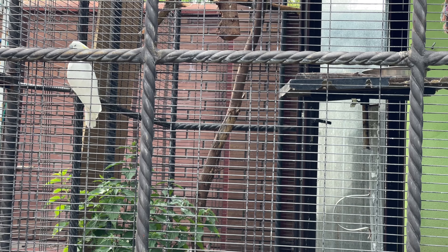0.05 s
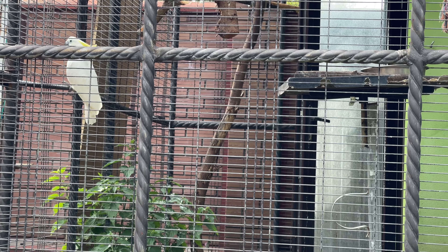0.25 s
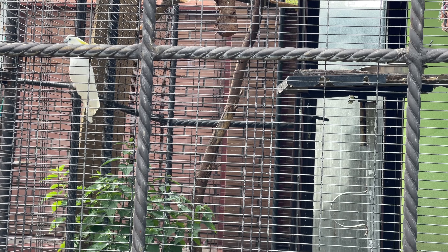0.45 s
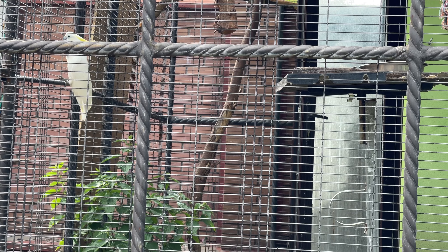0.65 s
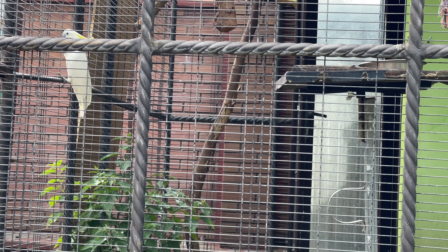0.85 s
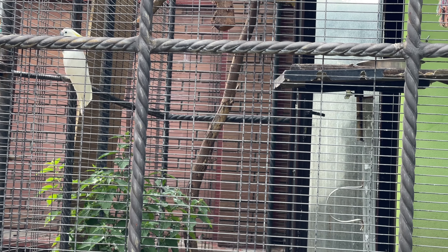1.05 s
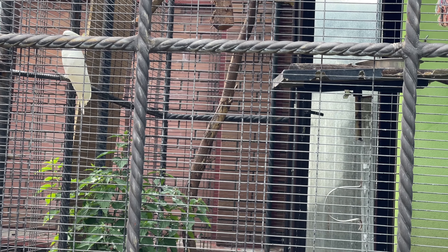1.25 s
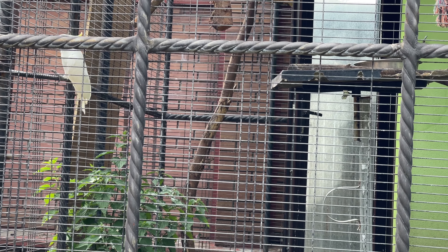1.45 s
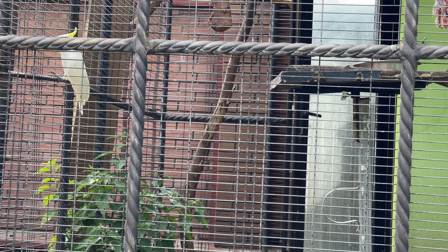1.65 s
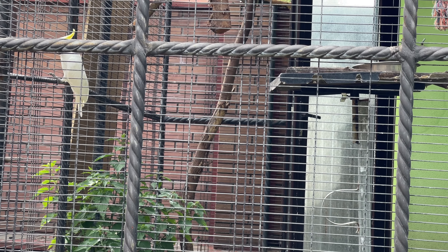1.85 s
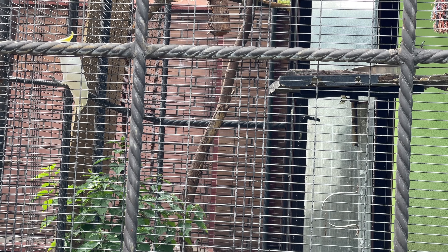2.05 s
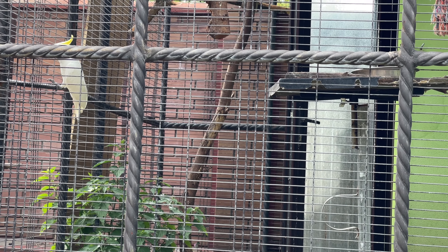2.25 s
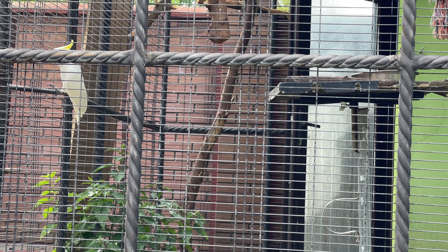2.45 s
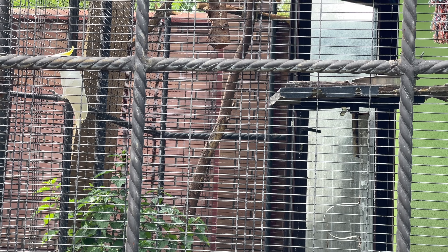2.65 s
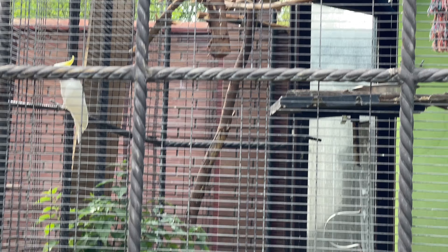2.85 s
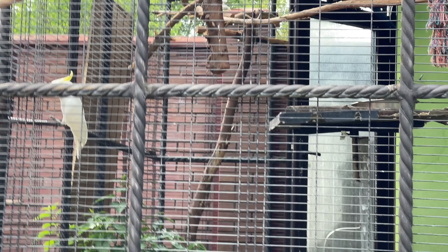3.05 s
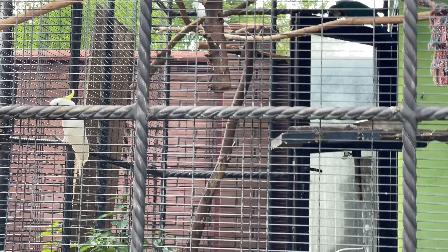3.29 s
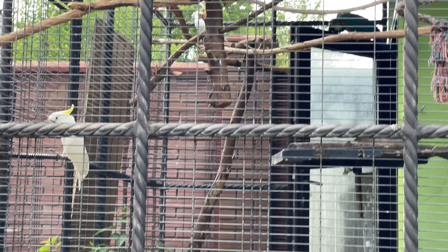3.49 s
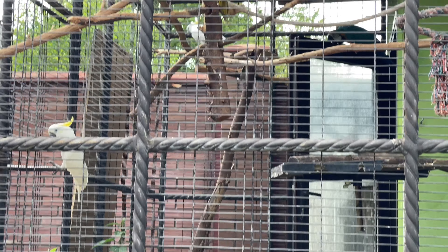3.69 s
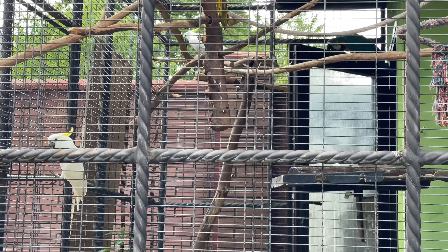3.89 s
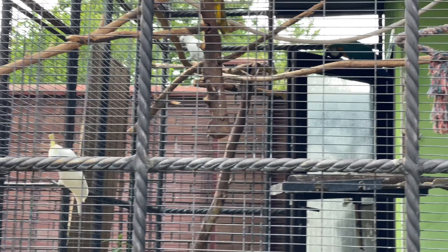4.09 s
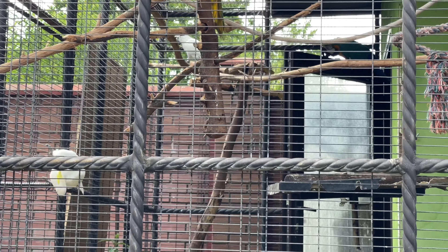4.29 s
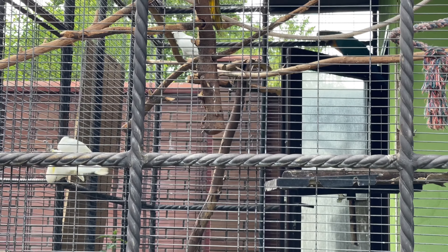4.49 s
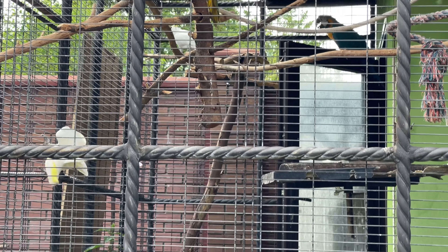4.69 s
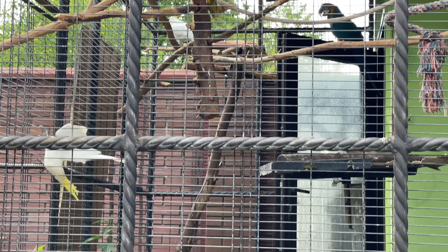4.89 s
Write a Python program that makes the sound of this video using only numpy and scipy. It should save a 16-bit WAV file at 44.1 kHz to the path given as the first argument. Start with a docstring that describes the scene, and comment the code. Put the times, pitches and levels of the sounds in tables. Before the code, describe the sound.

A hand-held phone picks up an outdoor aviary with brick walls nearby. For the first second there is only very faint distant rumble and thin hiss, then a few tiny knocks at 1.1-1.35 s. A cockatoo gives three short harsh calls at about 1.5, 1.9 and 2.1 s, torn and noisy with thin whistles; the first and last end in a clean yelp whose pitch collapses. Soft low bumps fall around 2.1-2.5 s, and a faint low tone slides down at 2.5 s. From 3.0 to 3.9 s the bird stutters nine rapid raspy pushes, weak at first, then higher and stronger, almost joined. Three long rough screeches follow at 4.0, 4.7 and 5.3 s, each about half a second; the first starts higher, the others scoop upward, all swell and end bright. Short echoes and a diffuse tail fade until about 6.3 s.

```python
"""A faint distant rumble under thin hiss is heard first, then small knocks and three short harsh calls of a cockatoo;
the bird then stutters its way up to three long raspy screeches. Pulses from its syrinx range from clean to chaotic,
throat resonances and the beak edge colour them, and gliding near-sines add whistles. Brick walls return early
echoes and a diffuse tail. Soft bumps and one sliding low tone are gated sines; knocks are decaying bands of noise.
A hand-held phone with two microphone ports receives it all in an outdoor aviary."""
import sys
import numpy as np
from scipy import signal
from scipy.fft import rfft, irfft
from scipy.io import wavfile
from scipy.ndimage import uniform_filter1d

SR = 44100
rng = np.random.default_rng(int(sys.argv[2]) if len(sys.argv) > 2 else 0)


def master_out(mix):
    """Clip the mix to full scale and print it as 16-bit PCM to the path in sys.argv[1]."""
    frames = np.transpose(np.atleast_2d(mix))
    ceiling = np.clip(frames, -1, 1)
    pcm = np.round(ceiling * 32767).astype(np.int16)
    wavfile.write(sys.argv[1], SR, pcm)


N = 279594
T = np.arange(N) / SR  # time axis, s
HZ = np.fft.rfftfreq(N, 1 / SR)  # frequency axis, Hz
STEPS = np.arange(0, N / SR, .0005)  # times at which the bird's controls are set, s

# Spectral density of the distant background: [f/Hz, relative level/dB per Hz]
AIR_COLOUR = [(15, -22.5), (25, -3), (93, -12), (298, -22), (349, -23.5), (1140, -29.5), (2180, -28.5),
              (2550, -32.5), (2820, -28.5), (3950, -35.5), (9030, -33.5), (12000, -21), (15600, -92),
              (22000, -120)]
# Course of the distant rumble: [t/s, level/dB]
RUMBLE_LEVEL = [(0, -71.5), (.7, -66), (2.8, -63), (4.5, -66), (6.3, -77.5)]
# Soft low tone that slides down: [start t/s, length/s, level/dB, start f/Hz, glide/(Hz/s)]
LOW_TONE_ROW = (2.53, .11, -54.5, 207, -630)
# Soft bumps on the phone: [centre t/s, level/dB, f/Hz, Gaussian length/s]
BUMP_ROWS = [(2.088, -55.5, 63, 0.027), (2.208, -41, 82.8, 0.0057), (2.321, -54.5, 60, 0.021),
             (2.481, -47, 76.3, 0.011)]
# Faint knocks about the cages: [t/s, starting level/dB, centre f/Hz, width/Hz, decay/s]
KNOCK_ROWS = [(1.11, -63, 6300, 700, .005), (1.148, -58, 2200, 2400, .004), (1.149, -63, 2540, 2400, 0.22),
              (1.15, -64, 700, 160, .045), (1.22, -63, 715, 160, .019), (1.338, -61.5, 720, 130, .066)]

# Reflections from near walls: [delay t/s, level/dB]
WALL_ECHOES = [(.0032, -23.5), (.0086, -10), (.0099, -11), (0.013, -6)]
# Reverberation; the bird beams its treble forward, so the walls get little of it: [f/Hz, t60/s, relative level/dB]
AVIARY_RING = [(400, .42, -3), (1280, 0.44, 6), (2260, 0.52, 3.5), (3220, 0.49, 0.5), (5060, 0.37, 1),
               (9000, 0.36, -1.5)]
# Phase between the microphone ports: [f/Hz, lead of left/rad]
PORT_LEAD = [(100, 0), (1100, .55), (1800, -.3), (3200, .65), (4200, .1), (8850, 0), (9200, -1.4),
             (10200, -3.14), (11000, -4.2), (11600, -6.28)]
# Level between the microphone ports: [f/Hz, left minus right level/dB]
PORT_LEVEL = [(200, 0), (900, 4), (1200, 2), (1500, 5), (2000, 0), (3000, -.6), (4000, 0)]
TOP_HZ = 12300  # upper limit of the partials and of the microphones

# Whistles that stand out of the calls: [start t/s, length/s, level/dB, start f/Hz, glide/(Hz/s)]
WHISTLE_ROWS = [(1.52, .033, -41, 2285, 499), (1.539, 0.057, -31, 2390, 6995),
                (1.607, 0.0076, -32.5, 2570, -2000), (1.87, .024, -28, 2570, -4000),
                (1.908, .11, -35, 1490, -1000), (1.945, 0.049, -31, 2525, 198.5),
                (2.095, 0.036, -29, 2570, -2400), (2.123, 0.047, -28.5, 1465, -1800),
                (2.172, .066, -29.5, 2500, 1206.5)]
# Broad tilt of the voice: [f/Hz, level/dB]
THROAT_TILT = [(250, -45.5), (450, -27), (650, -23), (1000, -17), (1600, -11), (2600, -4.5), (3800, -8.5),
               (6000, -12.5), (9000, -16.5), (11000, -15), (12400, -42.5)]
# Shape of the three throat resonances: [half width/Hz, level/dB]
THROAT_PEAKS = [(119, 4.5), (238, 7), (200, 5.5)]
# A trough and two upper windpipe modes: [multiple of the third resonance, half width/Hz, level/dB]
WINDPIPE_MODES = [(.53, 190, -4.5), (1.57, 260, 4.5), (2.12, 330, 4.5)]
# Chaos at full roughness: share of hiss, spread of the partials, shimmer of the pulses
HISS, SLIP_HZ, SHIMMER = .62, 150, .35
QUIVER = .03  # rms share by which the resonances move, at any roughness
DOUBLING, DOUBLING_ABOVE_HZ = 0.88, 890  # rough high notes alternate strong and weak pulses
# Every push starts and stops this far below its level
CALL_FADE_DB, STUTTER_FADE_DB, SCREECH_FADE_DB = -13.5, -11, -15

# Harsh squawks of the short calls:
# [start t/s, length/s, level/dB, f/Hz, roughness 0-1, first throat resonance f/Hz, beak edge share/dB]
SQUAWK_ROWS = [(1.537, 0.075, -33.5, 925.5, .95, 1000, -4), (1.88, 0.019, -22, 1231, 0.43, 1300, -5.5),
               (1.902, 0.13, -27.5, 800, 0.91, 1450, -7.5), (2.087, 0.085, -25, 781, .9, 1440, -7.5),
               (2.149, 0.1, -28.5, 773, 0.85, 1420, -6)]
SQUAWK_ATTACK_S, SQUAWK_RELEASE_S, SQUAWK_CHEST_DB = 0.018, 0.034, -15
SQUAWK_SECOND_HZ, SQUAWK_THIRD_HZ = 2860, 3520

# Clean yelps that end a call: [start t/s, length/s, level/dB, chest share/dB, beak edge share/dB]
YELP_ROWS = [(1.601, .081, -31, -8, -3.5), (2.231, .032, -19.5, -10.5, -7.5)]
YELP_HZ, YELP_END_HZ, YELP_ROUGH, YELP_FADE_S = 1165.7, 448.7, 0.2082, 0.013
COLLAPSE_LEAD_S, COLLAPSE_S = .019, .006  # pitch is halfway down this long before the end; speed of the fall
YELP_SECOND_HZ, YELP_THIRD_HZ = 2450, 3090

# Stuttering pushes of air that work up to the screeches: [start t/s, length/s, level/dB, f/Hz]
STUTTER_ROWS = [(2.974, 0.055, -30, 874.6), (3.046, 0.088, -28.5, 786.4), (3.135, 0.11, -33, 1354),
                (3.241, 0.082, -22.5, 1325), (3.338, 0.082, -23, 1271), (3.398, .1, -20, 1245),
                (3.499, 0.11, -19.5, 1226), (3.594, 0.15, -22, 1207), (3.712, 0.16, -21.5, 1181)]
STUTTER_ATTACK_S, STUTTER_RELEASE_S, STUTTER_ROUGH = 0.034, 0.057, .9
STUTTER_MOUTH_HZ, STUTTER_SAG_PER_S = (1490, 2480, 3776), 0.13  # throat resonances and their rate of sinking
# Chest share at the hardest push, beak edge share, and dB of chest share gained per dB of weakening
STUTTER_CHEST_DB, STUTTER_EDGE_DB, CHEST_LOSS = -9, -6.5, .35

# Long screeches: [start t/s, length/s, level/dB, f/Hz, throat tuning ratio, beak edge share/dB,
# time to a brief slackening/s, time to the crest/s, opening time in the high register/s]
SCREECH_ROWS = [(4.001, .55, -18.5, 763, 0.993, -12, 0.12, .3, .2),
                (4.676, 0.51, -19, 783.3, 1.018, -10.5, .17, .24, 0.0015),
                (5.322, 0.49, -20.5, 805.6, 1.036, -10, 0.11, .24, 0.0018)]
SCREECH_ATTACK_S, SCREECH_RELEASE_S, SWELL_DB_PER_S = 0.06, 0.064, 3
SLACK_DB, SLACK_S = -2.5, 0.051
SCOOP, SCOOP_S = .42, 0.054  # pitch and first resonance start low by this share and rise quickly
ARCH_PER_S2 = 1.05  # share by which pitch and throat droop on either side of the crest
# Throat resonances at the crest, before tuning: [f/Hz]
SCREECH_MOUTH = (940, 2257, 3176)
SCREECH_ROUGH, CLEARING_PER_S = 1.03, .5  # roughness at the start and its loss per second
SCREECH_CHEST_DB, SCOOP_CHEST_DB = -17, 10.5
FLARE_DB, FLARE_S = 4.5, 0.27  # the beak gapes and brightens the end
# The high register, its added shares, and the time it takes to flip in or out
HIGH_HZ, HIGH_CHEST_DB, HIGH_EDGE_DB, FLIP_S = 1270.7, 9, 5, .045


def undb(db):
    """Level in decibels expressed as an amplitude ratio."""
    return 10 ** (np.asarray(db) / 20)


def unit(x):
    """Normalisation to unit rms amplitude."""
    return x / np.sqrt(np.mean(x ** 2))


def ramp(x):
    """Linear transition limited to the range 0 to 1."""
    return np.clip(x, 0, 1)


def curves(rows):
    """Linear interpolation in time of each column of a table."""
    s, *columns = np.transpose(rows)
    return [np.interp(T, s, column) for column in columns]


def spectrum(points):
    """Interpolation of a spectrum along a logarithmic frequency axis."""
    hz, value = np.transpose(points)
    return np.interp(np.log(HZ + 1), np.log(hz), value)


def shaped(x, response):
    """Linear filtering as multiplication of spectra."""
    return irfft(rfft(x) * response, N)


def band(hz, width_hz):
    """Resonance curve: a squared Lorentzian with steep skirts."""
    return 1 / (1 + ((HZ - hz) / width_hz) ** 2) ** 2


def noise(response):
    """Coloured noise: white noise filtered and brought to unit rms."""
    return unit(shaped(rng.standard_normal(N), response))


def wander(rate_hz):
    """Random modulation: low-pass noise reaching up to about the given rate."""
    return noise(band(0, rate_hz))


def steady(x):
    """Level normalisation by a running rms, which leaves the rapid rasp."""
    return x / np.sqrt(uniform_filter1d(x ** 2, size=1500) + 1e-12)


def tone(row, unrest, overtone_db, fullness=.6):
    """Frequency modulation: a gliding near-sine with two overtones, each weaker by the same step, in one arch."""
    start, length, db, hz, glide = row
    on = (T >= start) & (T < start + length)
    t = T[on] - start
    phase = 2 * np.pi * np.cumsum((hz + glide * t) * (1 + unrest[on])) / SR
    wave = unit(sum(undb(overtone_db * k) * np.sin((k + 1) * phase) for k in range(3)))
    out = np.zeros(N)
    out[on] = wave * undb(db) * np.abs(np.sin(np.pi * t / length)) ** fullness
    return out


def background(flicker_db=0.6, side_db=-12, hiss_db=-66.5, low_cut_hz=42, top_hz=10500):
    """Superposed noise: a distant rumble swells and fades under thin hiss, nearly alike on both sides."""
    low_cut = 1 + (low_cut_hz / (HZ + 1)) ** 4
    high_cut = 1 + (HZ / top_hz) ** 20
    colour = undb(spectrum(AIR_COLOUR)) / low_cut / high_cut
    level_db, = curves(RUMBLE_LEVEL)
    side = undb(side_db) * noise(colour)
    air = noise(colour) + np.array([side, -side])
    rumble = shaped(air, band(0, 600))
    hiss = air - rumble
    flicker = undb(flicker_db * wander(5.9))
    return (rumble * undb(level_db) + hiss * undb(hiss_db)) * flicker


def low_tone(jitter=0.03):
    """Downward glide of a soft near-sine with slight random frequency modulation."""
    return tone(LOW_TONE_ROW, jitter * wander(440), overtone_db=-22)


def bumps():
    """Brief low-frequency oscillation in a Gaussian envelope as the hand shifts."""
    out = np.zeros(N)
    for s, db, hz, length in BUMP_ROWS:
        shudder = np.sqrt(2) * np.sin(2 * np.pi * hz * (T - s))
        out += undb(db) * shudder * np.exp(-.5 * ((T - s) / length) ** 2)
    return out


def knocks():
    """Exponential decay: each knock is a resonant band of noise that starts at once and dies away."""
    out = np.zeros(N)
    for s, db, hz, width, decay in KNOCK_ROWS:
        out += undb(db) * noise(band(hz, width)) * (T >= s) * np.exp(-np.abs(T - s) / decay)
    return out


def aviary(x, wet_db=-13, side_db=-1, build_s=0.003):
    """Reflection and reverberation: early wall echoes, then a diffuse tail that lasts longest in the middle range."""
    echoes = sum(undb(db) * np.exp(-2j * np.pi * HZ * s) for s, db in WALL_ECHOES)
    early = shaped(x, 1 + echoes)  # direct sound and echoes
    t, hz = T[:SR], np.fft.rfftfreq(SR, 1 / SR)
    ring_hz, ring_t60, ring_db = np.transpose(AVIARY_RING)
    white, tail = rfft(rng.standard_normal((2, SR))), 0
    for centre in 290 * 2. ** np.arange(0, 6, .5):  # overlapping half-octave bands
        share = np.clip(1 - 2 * np.abs(np.log2((hz + 1) / centre)), 0, 1)
        fading = np.exp(-np.log(1000) * t / np.interp(centre, ring_hz, ring_t60))
        tail = tail + undb(np.interp(centre, ring_hz, ring_db)) * irfft(white * share) * fading
    tail = tail * (1 - np.exp(-t / build_s))
    mid, side = (undb(wet_db) * signal.fftconvolve(x, h / np.linalg.norm(h))[:N] for h in tail)
    side = undb(side_db) * shaped(side, band(1200, 1800))
    return early + mid + np.array([side, -side])


def whistles(jitter=0.02):
    """Nearly pure tones of the bird, with glide and random frequency modulation."""
    unrest = jitter * wander(440)
    return sum(tone(row, unrest, overtone_db=-11.5) for row in WHISTLE_ROWS)


def push(t, length, attack_s, release_s, fade_db):
    """Amplitude envelope in dB of one push of air: attack from the fade level, hold, release to it, silence."""
    attack = ramp(1 - t / attack_s) ** 2
    release = ramp(1 - (length - t) / release_s) ** 2
    return np.where(t < length, fade_db * (attack + release), -120)


def squawk(t, length, db, hz, rough, first_hz, edge_db):
    """Forced chaotic vibration: a short rough push with set pitch and resonance centres."""
    level_db = db + push(t, length, SQUAWK_ATTACK_S, SQUAWK_RELEASE_S, CALL_FADE_DB)
    return level_db, hz, rough, SQUAWK_CHEST_DB, edge_db, first_hz, SQUAWK_SECOND_HZ, SQUAWK_THIRD_HZ


def yelp(t, length, db, chest_db, edge_db):
    """Sigmoid fall of frequency: a clean note collapses at its end and the first resonance follows it."""
    fall = 1 + np.exp((t - length + COLLAPSE_LEAD_S) / COLLAPSE_S)
    hz = YELP_END_HZ + (YELP_HZ - YELP_END_HZ) / fall
    level_db = db + push(t, length, YELP_FADE_S, YELP_FADE_S, CALL_FADE_DB)
    return level_db, hz, YELP_ROUGH, chest_db, edge_db, hz, YELP_SECOND_HZ, YELP_THIRD_HZ


def stutter(t, length, db, hz):
    """Effort-dependent timbre: weak chaotic pushes have more chest tone, and the throat sinks through the run."""
    level_db = db + push(t, length, STUTTER_ATTACK_S, STUTTER_RELEASE_S, STUTTER_FADE_DB)
    hardest_db = max(row[2] for row in STUTTER_ROWS)
    chest_db = STUTTER_CHEST_DB + CHEST_LOSS * (hardest_db - db)
    sag = np.exp(-STUTTER_SAG_PER_S * (STEPS - STUTTER_ROWS[0][0]))
    mouth = [centre * sag for centre in STUTTER_MOUTH_HZ]
    return level_db, hz, STUTTER_ROUGH, chest_db, STUTTER_EDGE_DB, *mouth


def long_screech(t, length, db, hz, tuning, edge_db, slack_at, crest_at, high_for):
    """Coupled pitch and resonance: both scoop up and arch over while the tone swells, clears and ends bright."""
    level_db = db + push(t, length, SCREECH_ATTACK_S, SCREECH_RELEASE_S, SCREECH_FADE_DB)
    slack_db = SLACK_DB * np.exp(-((t - slack_at) / SLACK_S) ** 2)
    level_db = level_db + SWELL_DB_PER_S * t + slack_db
    high = ramp(np.minimum(t, high_for - t) / FLIP_S)  # share of the high register
    scoop = np.exp(-t / SCOOP_S)
    arch = 1 - ARCH_PER_S2 * (t - crest_at) ** 2
    low_share = (1 - high) * (1 - SCOOP * scoop)
    first, second, third = (centre * tuning * arch for centre in SCREECH_MOUTH)
    pitch = high * HIGH_HZ + low_share * hz * arch
    first = high * HIGH_HZ + low_share * first
    rough = SCREECH_ROUGH - CLEARING_PER_S * t
    chest_db = SCREECH_CHEST_DB + np.maximum(SCOOP_CHEST_DB * scoop, HIGH_CHEST_DB * high)
    edge_db = edge_db + HIGH_EDGE_DB * high + FLARE_DB * np.exp((t - length) / FLARE_S)
    return level_db, pitch, rough, chest_db, edge_db, first, second, third


def performance():
    """Succession of control states: each call in turn sets level, pitch, roughness, shares and resonances."""
    kinds = (squawk, SQUAWK_ROWS), (yelp, YELP_ROWS), (stutter, STUTTER_ROWS), (long_screech, SCREECH_ROWS)
    calls = sorted(((row, kind) for kind, rows in kinds for row in rows), key=lambda call: call[0][0])
    controls = None
    for (start, length, *rest), kind in calls:
        t = np.clip(STEPS - start, 0, length)
        new = np.array(np.broadcast_arrays(*kind(t, length, *rest)))
        controls = new if controls is None else np.where(STEPS >= start, new, controls)
    controls[0, STEPS < calls[0][0][0]] = -120  # silent before the first call
    return curves(np.column_stack([STEPS, *controls]))


def syrinx(hz, rough, jitter=0.0184, wobble=.03, rattle=0.1, flutter=0.098):
    """Chaotic oscillation: pulse period, shape and strength lose order with roughness; air hisses at each opening."""
    rough = np.clip(rough, 0, 1.1)
    unrest = jitter * wander(586) + wobble * wander(47.69)
    phase = 2 * np.pi * np.cumsum(hz * (1 + rough * unrest)) / SR
    # The two sides of the membrane slip against each other, which tears all partials equally wide
    slip = 2 * np.pi * np.cumsum(SLIP_HZ * rough * wander(300.5)) / SR
    # Upper partials lag, so each pulse is a short chirp
    partials = (np.cos(k * phase + slip - k ** 2 / 10) * (k * hz < TOP_HZ) for k in np.arange(1, 17))
    pulses = steady(sum(partials))
    doubling = DOUBLING * rough ** 2 * (hz > DOUBLING_ABOVE_HZ) * np.cos(phase / 2)
    strength = 1 + doubling + SHIMMER * rough * wander(1300)
    air = HISS * rough ** 2 * (1 + .5 * np.cos(phase)) * rng.standard_normal(N)
    return (pulses * strength + air) * np.exp(rough * (rattle * wander(320) + flutter * wander(70)))


def throat(source, mouth):
    """Source-filter principle: a broad tilt with moving resonances, which quiver with the tongue."""
    hz, s, frames = signal.stft(source, SR, nperseg=512, noverlap=384)
    first, second, third = (np.interp(s, T, centre * (1 + QUIVER * wander(28))) for centre in mouth)
    peaks = [(centre, *shape) for centre, shape in zip((first, second, third), THROAT_PEAKS)]
    peaks += [(multiple * third, width, db) for multiple, width, db in WINDPIPE_MODES]
    peaks_db = sum(db / (1 + ((hz[:, None] - centre) / width) ** 2) for centre, width, db in peaks)
    tilt_db = np.interp(hz, HZ, spectrum(THROAT_TILT))[:, None]
    _, voice = signal.istft(frames * undb(tilt_db + peaks_db), SR, nperseg=512, noverlap=384)
    return voice[:N]


def cockatoo():
    """Division of power between bands: the filtered syrinx shifts weight between chest, core and open beak edge."""
    level_db, hz, rough, chest_share_db, edge_share_db, *mouth = performance()
    voice = throat(syrinx(hz, rough), mouth)
    chest_share, edge_share = undb(chest_share_db), undb(edge_share_db)
    core_share = np.sqrt(np.clip(1 - chest_share ** 2 - edge_share ** 2, .1, 1))
    below = 1 / (1 + (HZ / 1750) ** 12)
    above = 1 - 1 / (1 + (HZ / 3900) ** 12)
    chest = chest_share * steady(shaped(voice, below))
    core = core_share * steady(shaped(voice, 1 - below - above))
    edge = edge_share * steady(shaped(voice, above))
    return (chest + core + edge) * uniform_filter1d(undb(level_db), size=220)


def scene(voice_db=-1):
    """Superposition of the bird in its aviary and the small sounds around it."""
    bird = aviary(undb(voice_db) * cockatoo() + whistles())
    return background() + low_tone() + bumps() + knocks() + bird


def record(dry):
    """Two-port reception: the ports differ in phase and level, and a steep low-pass removes the top."""
    half = np.exp(.5j * spectrum(PORT_LEAD)) * undb(spectrum(PORT_LEVEL) / 2)
    ports = np.array([shaped(dry[0], half), shaped(dry[1], 1 / half)])
    return signal.sosfilt(signal.ellip(10, .2, 80, TOP_HZ, fs=SR, output="sos"), ports)


dry = scene()
out = record(dry)
master_out(out)
```